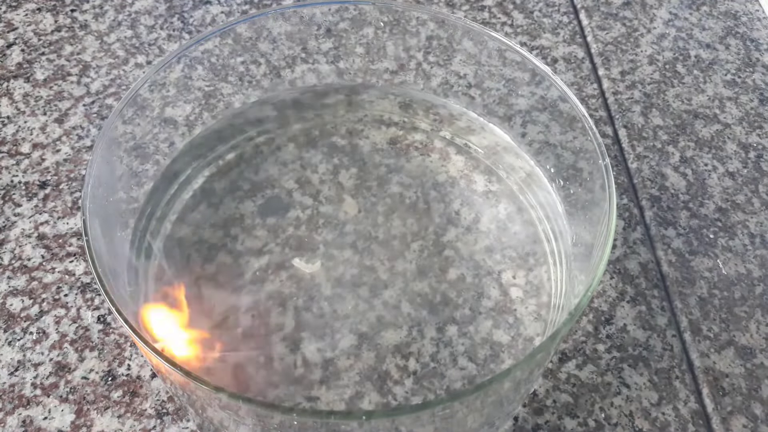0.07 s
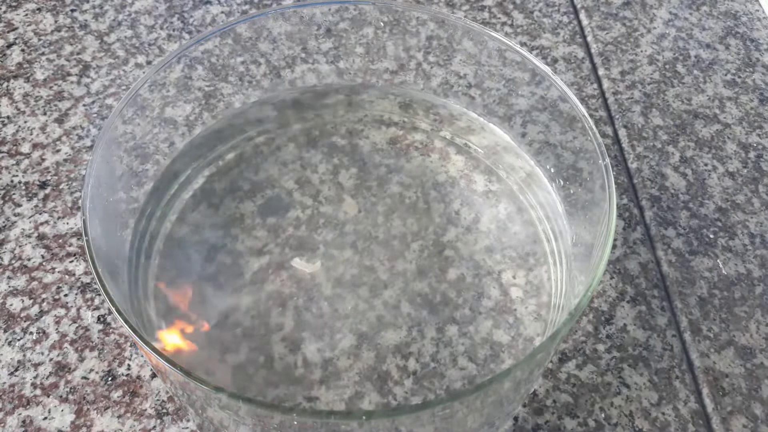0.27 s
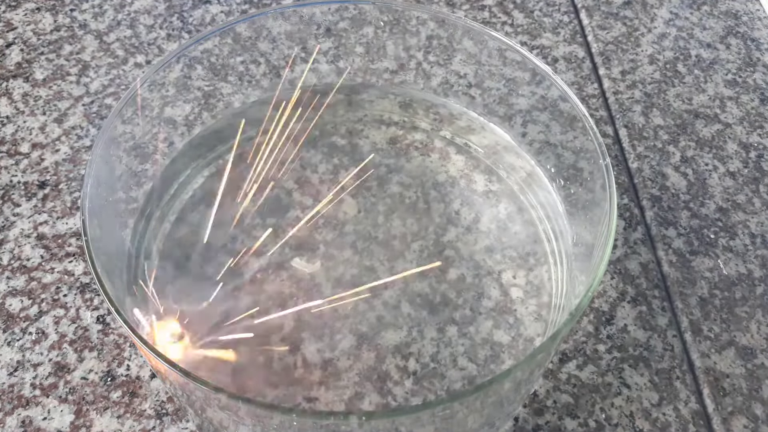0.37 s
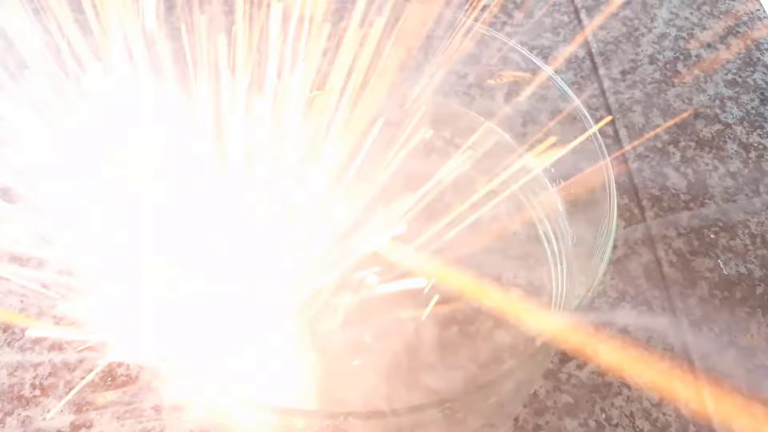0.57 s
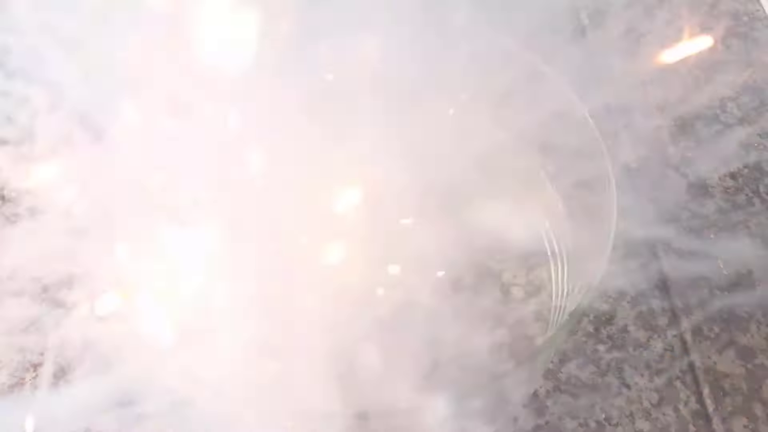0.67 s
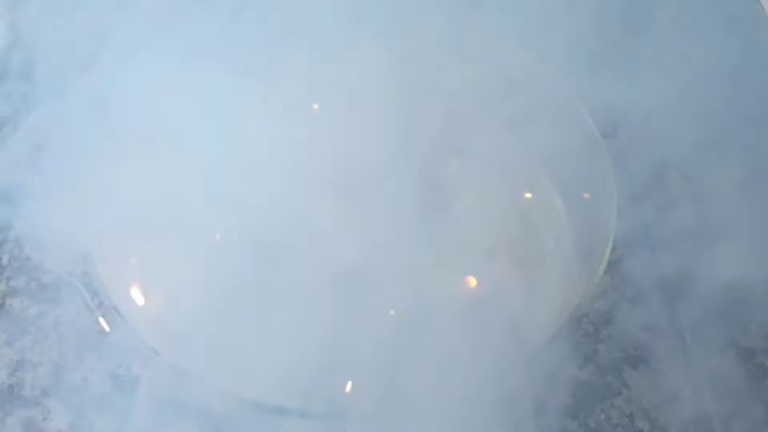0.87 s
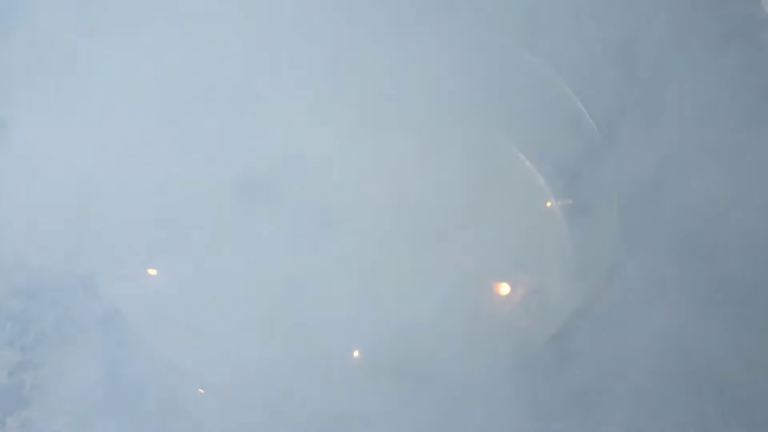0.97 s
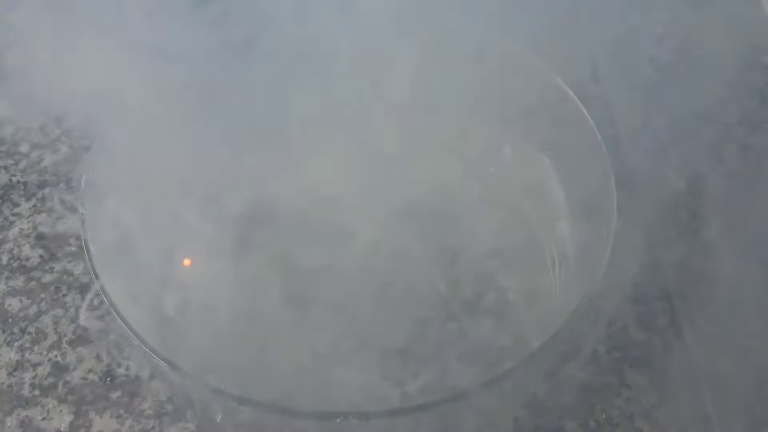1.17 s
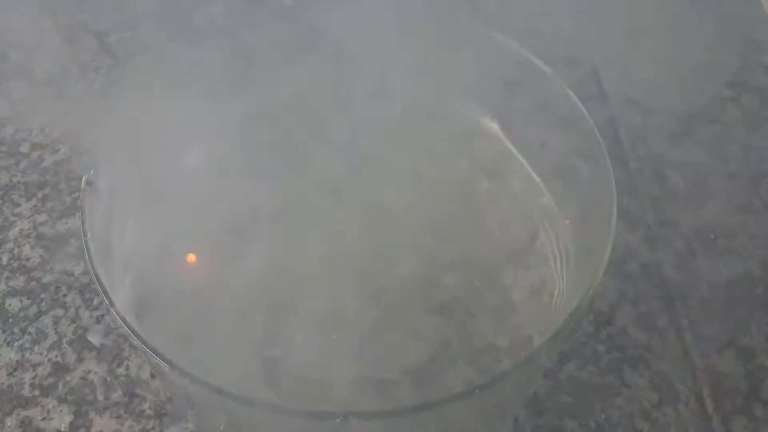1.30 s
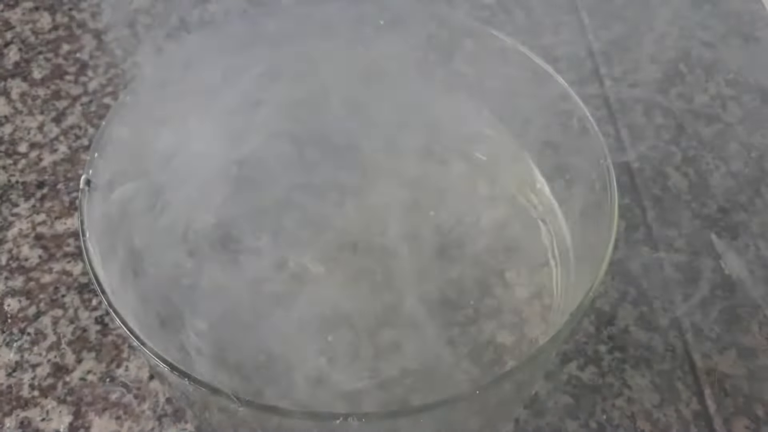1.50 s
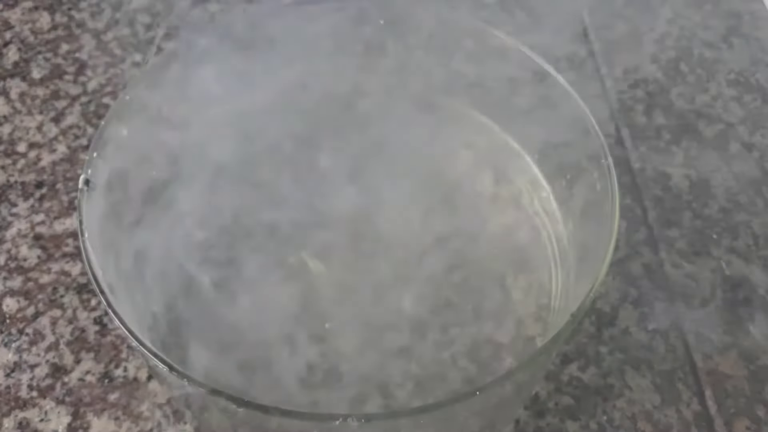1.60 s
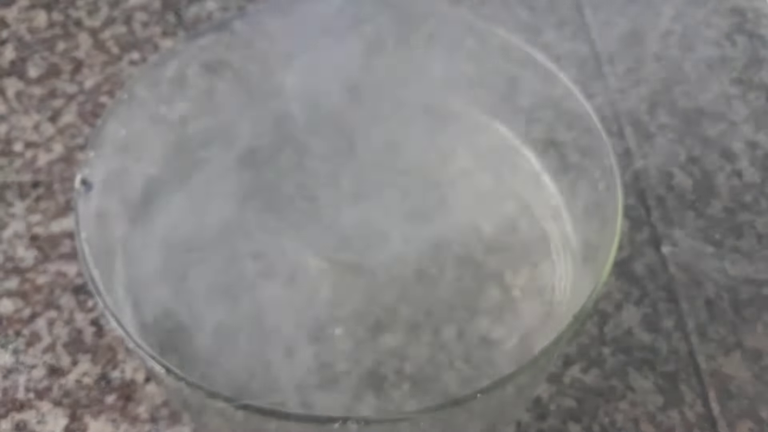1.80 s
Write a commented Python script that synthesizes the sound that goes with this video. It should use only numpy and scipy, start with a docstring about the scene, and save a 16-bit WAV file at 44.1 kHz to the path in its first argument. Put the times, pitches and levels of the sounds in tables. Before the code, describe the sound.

Metal fizzing on water in a glass bowl, then exploding with a bang and sizzling pops.

```python
"""Sodium exploding on water

A lump of sodium burns on water in a glass bowl outdoors. It fizzes harder and harder, spits, flares,
and blows apart with a thump and a roar of burning spray. Scattered droplets pop and sizzle out
against the water and the glass. The close microphone overloads on the loudest cracks."""
import sys
import numpy as np
from scipy import signal
from scipy.fft import rfft, irfft
from scipy.io import wavfile
from scipy.ndimage import uniform_filter1d, minimum_filter1d

SR = 44100
rng = np.random.default_rng(int(sys.argv[2]) if len(sys.argv) > 2 else 0)


def dump(signal):
    """Clip the signal to [-1, 1] and save it as 16-bit WAV at the path in sys.argv[1]."""
    limited = np.clip(np.atleast_2d(signal).T, -1, 1)
    pcm = np.round(limited * 32767).astype(np.int16)
    wavfile.write(sys.argv[1], SR, pcm)


N = 81585
TIME = np.arange(N) / SR
BLAST_S = .5517

# spectrum of a spit or gas crack: f/Hz, level/dB
CRACK_SPECTRUM = [(40, -66), (200, -12), (500, -9.5), (900, -10.5), (2200, 2.5), (2900, -3), (4500, 0),
                  (8000, -4), (10000, -29), (15000, -32)]


def undb(db):
    """Decibels to gain."""
    return 10 ** (np.asarray(db) / 20)


def unit(x):
    """Scale to rms 1."""
    return x / np.sqrt(np.mean(x ** 2))


def curve(rows):
    """A fader ride through rows of t/s, level/dB, held at both ends."""
    return undb(np.interp(TIME, *np.array(rows).T))


def colour(x, points):
    """Minimum-phase EQ through rows of f/Hz, level/dB; white noise keeps its power."""
    size = 4096
    hz, db = np.array(points, float).T
    bin_hz = np.arange(size // 2 + 1) * SR / size
    gain = unit(undb(np.interp(np.log(bin_hz + 1), np.log(hz), db)))
    cepstrum = irfft(np.log(gain))
    cepstrum[1:size // 2] *= 2
    cepstrum[size // 2 + 1:] = 0
    return signal.oaconvolve(x, irfft(np.exp(rfft(cepstrum))))[:N]


def burst(start, attack, decay):
    """Straight rise, exponential fall; times in seconds."""
    age = TIME - start
    return np.clip(age / attack, 0, 1) * np.exp(-np.clip((age - attack) / decay, 0, 50))


def bursts(rows):
    """Power sum of bursts from rows of t/s, level/dB, attack/s, decay/s."""
    return np.sqrt(sum((undb(db) * burst(s, attack, decay)) ** 2 for s, db, attack, decay in rows))


def noise_bursts(rows, attack):
    """White noise in bursts from rows of t/s, level/dB, decay/s."""
    return rng.standard_normal(N) * bursts([(s, db, attack, decay) for s, db, decay in rows])


def echoes(x, delay, decay):
    """Dense reflections that die away."""
    tail = rng.standard_normal(N) * burst(delay, delay, decay)
    return signal.fftconvolve(x, tail / np.linalg.norm(tail))[:N]


def bubbling():
    """Thousands of tiny gas bubbles bursting over a jet of steam; rms 1."""
    bubbles_per_s, spread_db, steam_db = 5000, 2, -7
    hit = rng.random(N) < bubbles_per_s / SR
    size = undb(spread_db * np.minimum(rng.exponential(size=N), 6)) * rng.choice([-1, 1], N)
    return unit(unit(hit * size) + undb(steam_db) * rng.standard_normal(N))


def bowl(x):
    """The bowl rings along with what happens inside it."""
    # resonances of the glass and the air in it: f/Hz, width/Hz, level/dB
    modes = [(700, 17, -5), (884, 44, 0), (1020, 16, -36), (1450, 35, -25), (1460, 46, -14),
             (2103, 113, -3.5), (3840, 41, -22), (4344, 210, 2)]
    return x + sum(undb(db) * signal.lfilter(*signal.iirpeak(hz, hz / width, fs=SR), x)
                   for hz, width, db in modes)


def air():
    """A quiet, steady bed of outdoor air."""
    # ambience spectrum: f/Hz, level/dB
    spectrum = [(25, -31), (45, -14), (95, -5.5), (300, -2.5), (440, -4.5), (720, -0.5), (1000, -4.5),
                (1600, -5), (2200, -22.5), (3200, -12.5), (8000, -29), (15500, -48)]
    return undb(-55) * colour(rng.standard_normal(N), spectrum)


def fizz():
    """The molten lump skates on its own hydrogen, hissing and spitting."""
    # build-up to the blast: t/s, level/dB
    ride = [(0, -27), (.12, -26), (.18, -24.5), (.25, -22.5), (.28, -22), (.33, -23.5), (.36, -23.5),
            (.385, -24), (.47, -21), (.52, -22.5), (.55, -39), (.6, -56)]
    # hiss spectrum: f/Hz, level/dB
    spectrum = [(40, -62), (100, -8.5), (200, -5.5), (850, -2.5), (1700, -11.5), (2130, 3), (2500, -9.5),
                (3050, -9.5), (3350, 1), (3950, -1.5), (4120, 3.5), (4400, -1), (5500, 5.5), (5950, -17),
                (6400, -1), (7500, -2.5), (8600, -5), (9900, -20), (10800, -15), (12800, -11), (13800, -12),
                (15300, -7)]
    spits_per_s, spit_db, spread_db = 80, -12, 2.5
    spits = (rng.random(N) < spits_per_s / SR) * undb(spread_db * rng.standard_normal(N))
    hiss = colour(bubbling(), spectrum)
    return (hiss + undb(spit_db) * colour(unit(spits), CRACK_SPECTRUM)) * curve(ride)


def cracks():
    """Pockets of hydrogen ignite with broad, dry cracks."""
    # ignitions: t/s, level/dB, decay/s
    hits = [(.0236, -7, 0.00033), (.0735, -6, 0.00049), (.197, -15, 0.00034), (.2525, -11, 0.00034),
            (0.3064, -5, .0005), (.3582, -3, 0.00048), (.3792, 0.5, 0.00062), (.3897, 2, 0.00054),
            (.4282, -6.5, 0.0011), (.4462, -4, .0008), (.5351, -1.5, 0.0013), (.5562, -10, 0.00014),
            (1.29, -24, 0.00024)]
    return colour(noise_bursts(hits, attack=.0001), CRACK_SPECTRUM)


def puffs():
    """Small clouds of hydrogen catch fire with a dull puff."""
    # soft ignitions: t/s, level/dB, decay/s
    hits = [(0.2875, -37, 0.0027), (0.2937, -13, 0.00066), (0.3779, -10, 0.00068), (0.3902, -8, 0.00068),
            (0.534, -24, 0.005), (0.5503, -5.5, 0.0034)]
    # dark puff spectrum: f/Hz, level/dB
    spectrum = [(40, -10), (150, -8), (500, 5.5), (1100, -0.5), (1700, -13), (3000, -19), (15000, -44)]
    return colour(noise_bursts(hits, attack=.0004), spectrum)


def pops():
    """Each metal droplet bursts with a snap and a few cycles of a collapsing gas bubble."""
    # droplets: t/s, level/dB, f/Hz, swell/ms, snap against tone/dB
    droplets = [(.3582, 4, 4970, 0.19, -1), (0.3899, -0.5, 2270, 0.22, -10.5),
                (0.4461, -3, 3220, 0.22, -2.5), (.5298, 1, 5500, 0.1, -1), (.5351, 9, 5500, 0.18, -10.5),
                (0.5445, -5.5, 4650, 0.11, 6), (0.7058, 5, 4210, 0.27, -11.5),
                (.8281, 0.5, 3635, 0.73, -10.5), (.8516, 5, 5330, 0.23, -14), (.9906, -2, 5310, 0.47, -39),
                (.9919, -7.5, 6900, 0.44, -13.5), (.9997, -3, 4970, 0.26, -7.5),
                (1.0337, -15, 5430, 0.13, 1), (1.1178, -8.5, 5560, 0.21, -2.5),
                (1.3298, -39, 5320, 0.39, -18), (1.3452, -11, 4960, 0.56, -6),
                (1.3468, -17.5, 5520, 1, -33)]
    # bright snap spectrum: f/Hz, level/dB
    spectrum = [(60, -49), (700, -26), (2300, -11), (3300, -9), (5000, -3), (7600, 12.5), (9800, -18.5),
                (12000, -3), (15300, 3.5)]
    sag = .071  # roughly the share of pitch lost per swell time
    tones, snaps = np.zeros(N), np.zeros(N)
    for s, db, hz, swell_ms, snap_db in droplets:
        swell = swell_ms / 1000
        age = np.clip((TIME - s) / swell, 0, 20)  # in swell times
        envelope = undb(db) * age ** 2 * np.exp(2 * (1 - age))
        bend = np.exp(sag * (1 - age / 2) / (1 + age / 10))
        tones += envelope * np.sin(2 * np.pi * hz * swell * age * bend)
        snaps += envelope * undb(snap_db)
    return tones + colour(snaps * rng.standard_normal(N), spectrum)


def pings():
    """The glass and the droplets on it give short, clear rings."""
    # rings: t/s, level/dB, f/Hz, decay/s
    rings = [(.3582, -19.5, 3345, 0.015), (.3897, -21, 2180, 0.028), (.4462, -27, 3360, 0.018),
             (0.5618, -9.5, 4345, 0.03), (0.577, -6, 4500, 0.01), (1.166, -40.5, 3780, 0.029),
             (1.346, -37, 4290, 0.018), (1.3463, -40, 5380, 0.048)]
    return sum(undb(db) * burst(s, .00017, decay) * np.sin(2 * np.pi * hz * (TIME - s))
               for s, db, hz, decay in rings)


def flares():
    """Burning hydrogen flares up and rings the bowl."""
    # flames: t/s, level/dB, attack/s, decay/s
    flames = [(.378, -14.5, 0.0016, .003), (.391, -19.5, 0.0055, 0.033), (.402, -13, 0.0027, 0.024),
              (.432, -17, 0.013, 0.027)]
    # flame spectrum: f/Hz, level/dB
    spectrum = [(35, -68), (60, -30), (167, -56), (613, -12.5), (673, -12), (738, -9.5), (1230, -8),
                (1380, -2), (1700, -11.5), (2310, -9), (3120, -30), (4740, -10.5), (7540, -20.5),
                (10200, -59), (15500, -50)]
    return unit(bowl(colour(bubbling(), spectrum))) * bursts(flames)


def jet():
    """A thin jet of escaping gas whistles briefly."""
    pitch_hz, width_hz = 9400, 340
    band = signal.iirpeak(pitch_hz, pitch_hz / width_hz, fs=SR)
    whistle = signal.lfilter(*band, signal.lfilter(*band, rng.standard_normal(N)))
    return undb(-34.5) * unit(whistle) * burst(start=.455, attack=.011, decay=.069)


def sparks():
    """Sparks give tiny, bright ticks."""
    # ticks: t/s, level/dB
    hits = [(.5352, -28), (0.5442, -8), (.5533, -7), (.7375, -18), (0.9365, -16), (0.938, -5), (0.9435, -3),
            (1.0192, -5.5), (1.186, -26), (1.3578, -16)]
    ticks = noise_bursts([(s, db, .0003) for s, db in hits], attack=.0001)
    return signal.sosfilt(signal.butter(2, 6500, "high", fs=SR, output="sos"), ticks)


def thump():
    """The pressure wave of the explosion: a cracking front and a quickly damped swing."""
    # spectrum of the front: f/Hz, level/dB
    spectrum = [(100, -3), (700, 3), (2000, 2), (6500, -1), (9500, -10), (15000, -10)]
    swing_hz, lead_s, hold_s = 113, .0005, .0012
    swing = -np.cos(2 * np.pi * swing_hz * (TIME - BLAST_S)) * burst(BLAST_S, .00028, decay=.0028)
    front_age = TIME - BLAST_S + lead_s
    gate = (front_age > 0) & (front_age < hold_s)
    front = colour(rng.standard_normal(N) * gate, spectrum)
    return undb(4) * swing + undb(3) * front


def roar():
    """Burning spray surges out of the bowl and leaves a darker tail."""
    # surges: t/s, level/dB, attack/s, decay/s
    surges = [(.5602, -9, 0.002, 0.0093), (.579, 11, 0.00017, 0.0033), (.581, -8.5, .01, 0.12),
              (.615, -8.5, 0.011, 0.043)]
    # burning spray spectrum: f/Hz, level/dB
    spectrum = [(30, -54), (60, -26), (110, -22.5), (170, -9.5), (260, -9), (320, -4.5), (520, -13),
                (720, -4.5), (1000, -4.5), (1180, -6), (1400, 0.5), (1750, -5.5), (2150, -6), (2550, -9),
                (3050, -5.5), (3500, -1.5), (4250, -3.5), (5100, -5.5), (7200, -4), (8300, -11.5),
                (9700, -22), (12000, -22.5), (15300, -16.5)]
    spray = unit(bowl(colour(bubbling(), spectrum))) * bursts(surges)
    lowpass = signal.butter(2, 2160, fs=SR, output="sos")
    tail = unit(signal.sosfilt(lowpass, bowl(colour(bubbling(), spectrum))))
    return spray + undb(-16.5) * tail * burst(BLAST_S, attack=.082, decay=.13)


def sizzles():
    """Scattered metal fizzes out, single droplets in short spurts of steam."""
    # spurts: t/s, level/dB, decay/s
    spurts = [(0.8158, -17, 0.016), (0.864, -16, .003), (.937, -16, 0.0023), (1.1203, -29, 0.0062),
              (1.1248, -18.5, 0.0015), (1.165, -25.5, 0.0064), (1.196, -32.5, 0.009), (1.357, -41.5, 0.059),
              (1.4428, -26.5, 0.0027), (1.449, -40, .015), (1.5257, -34, 0.0044), (1.716, -42.5, .008),
              (1.752, -43.5, .009), (1.777, -44.5, .005)]
    # wet fizz, already faintly there before the blast: t/s, level/dB
    ride = [(.55, -37), (.6, -25), (.8, -55), (.9, -36), (1.02, -41), (1.15, -41), (1.3, -45.5),
            (1.45, -45.5), (1.58, -55), (1.85, -66)]
    # sizzle spectrum: f/Hz, level/dB
    spectrum = [(100, -31), (2000, -9), (3000, -8), (4200, 4.5), (5300, 3.5), (7500, 5), (9800, -8.5),
                (12000, -8.5), (15300, -2.5)]
    return colour(bubbling() * curve(ride) + noise_bursts(spurts, attack=.0012), spectrum)


def scene():
    """The reaction, reflected by the bowl and the yard, over quiet outdoor air."""
    bowl_db, yard_db, wall_db = -7, -12.5, -10
    bangs = (cracks() + sparks()) / 2 + pops()
    bangs += undb(bowl_db) * echoes(bangs, delay=.00068, decay=.0017)
    yard = undb(yard_db) * echoes(bangs, delay=.011, decay=.084)
    hiss = fizz() + flares() + jet() + roar() + sizzles()
    hiss += undb(wall_db) * echoes(hiss, delay=.00038, decay=.01)
    hiss /= np.hypot(1, undb(wall_db))  # back to its dry power
    return (hiss + puffs() + thump() + bangs + pings() + yard + air())[None]


def record(dry):
    """A fast limiter ducks around the loudest peaks, the rest clips softly; the top is cut."""
    limit_db, clip_db, top_hz, window_samples = 7, -.6, 15700, 131
    gain = np.minimum(1, undb(limit_db) / (np.abs(dry) + 1e-9))
    limited = dry * uniform_filter1d(minimum_filter1d(gain, window_samples), window_samples)
    clipped = limited / (1 + (limited / undb(clip_db)) ** 6) ** (1 / 6)
    return signal.sosfilt(signal.ellip(10, .2, 70, top_hz, fs=SR, output="sos"), clipped)


dry = scene()
out = record(dry)
dump(out)
```